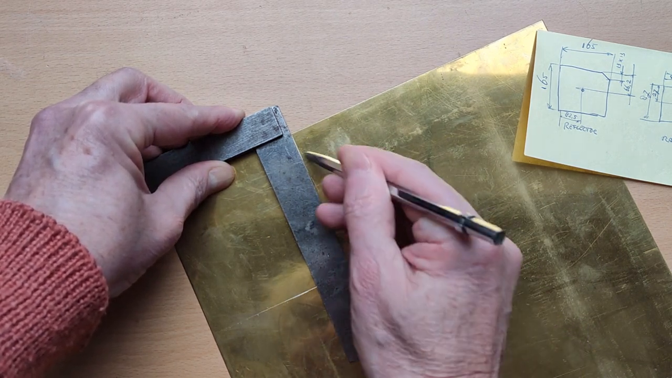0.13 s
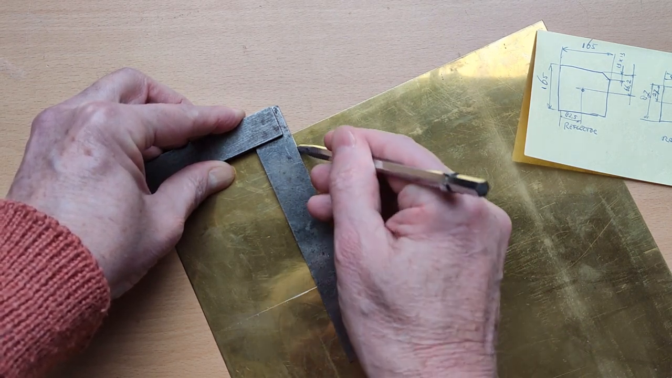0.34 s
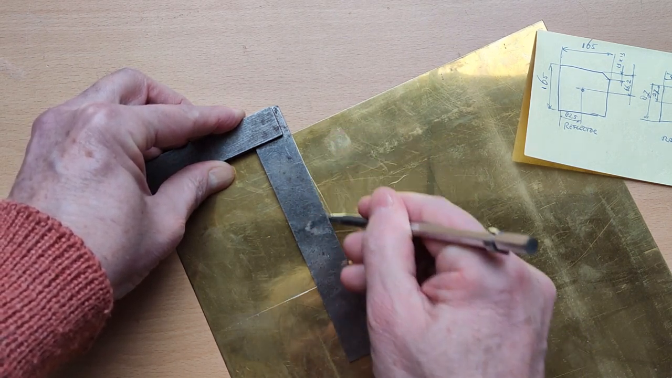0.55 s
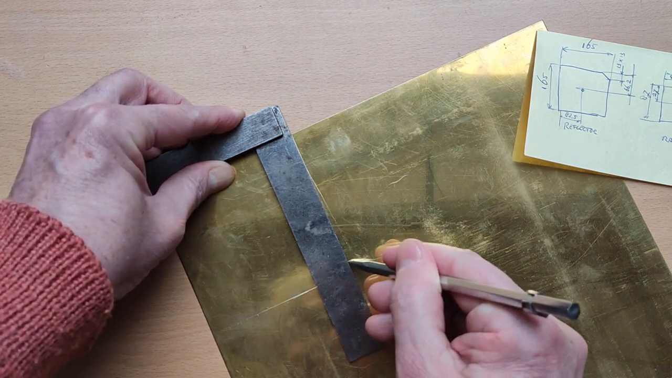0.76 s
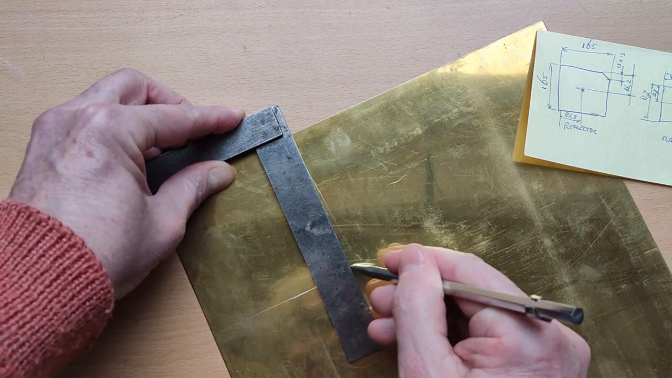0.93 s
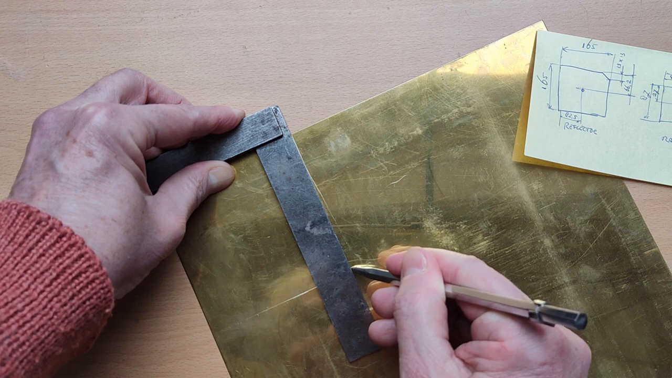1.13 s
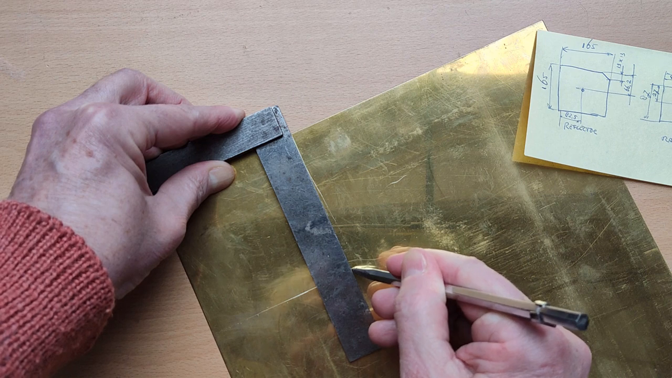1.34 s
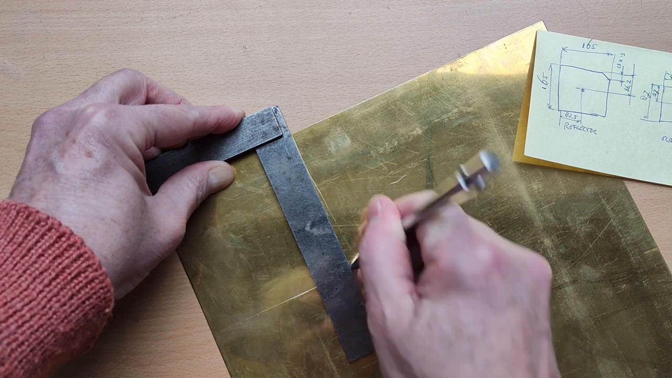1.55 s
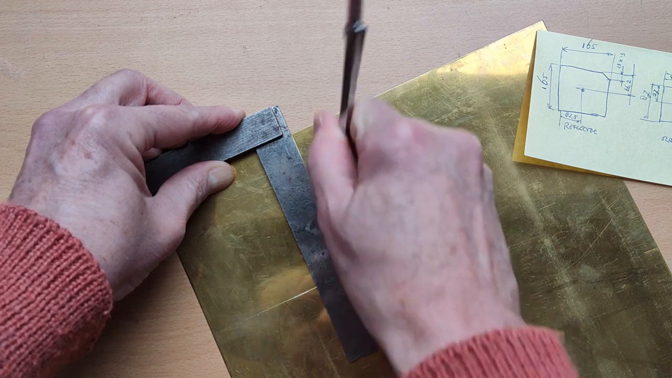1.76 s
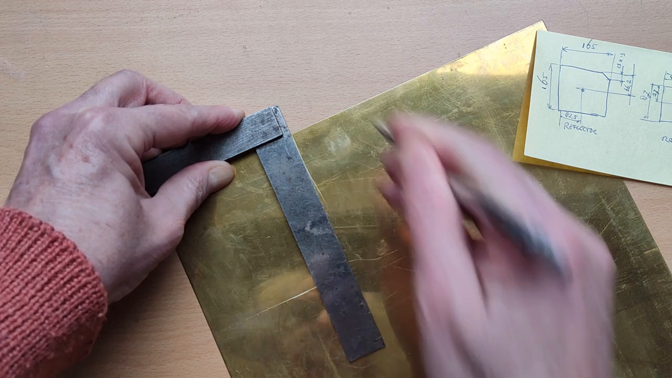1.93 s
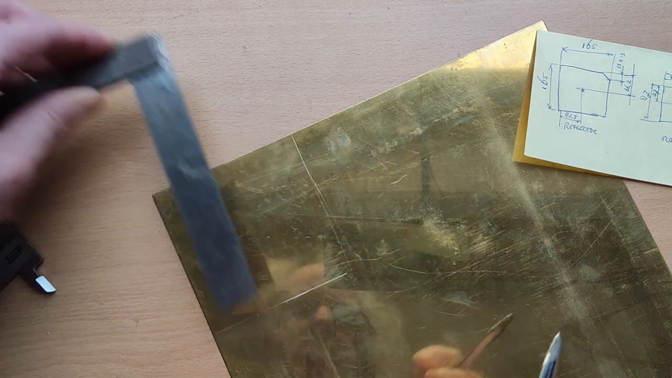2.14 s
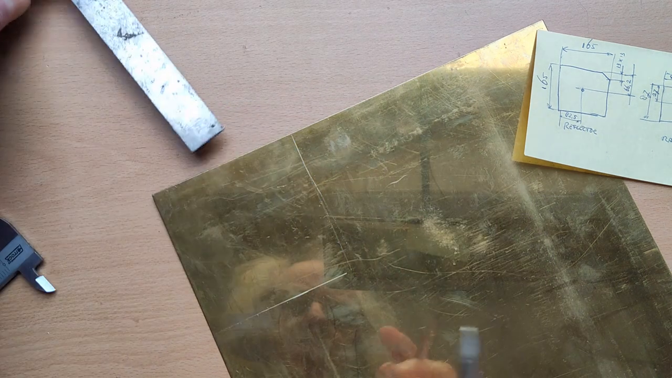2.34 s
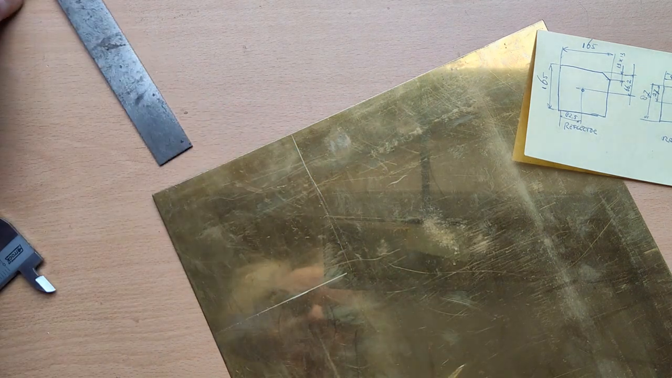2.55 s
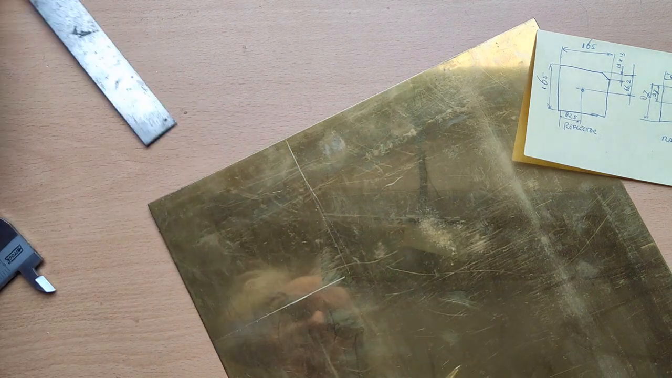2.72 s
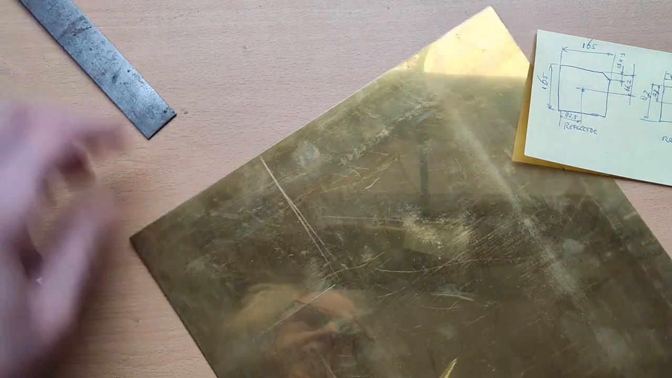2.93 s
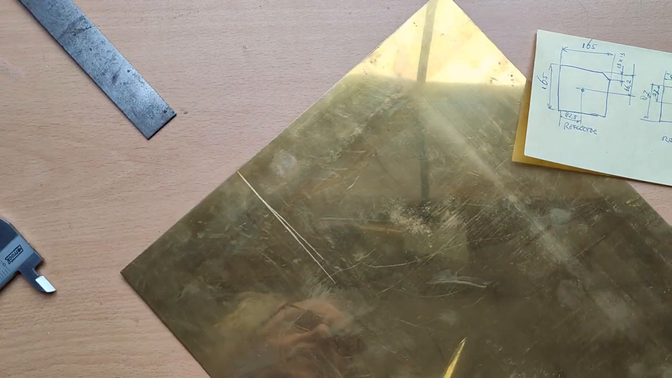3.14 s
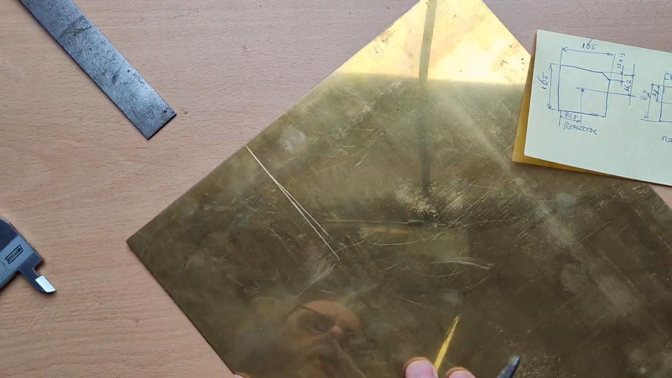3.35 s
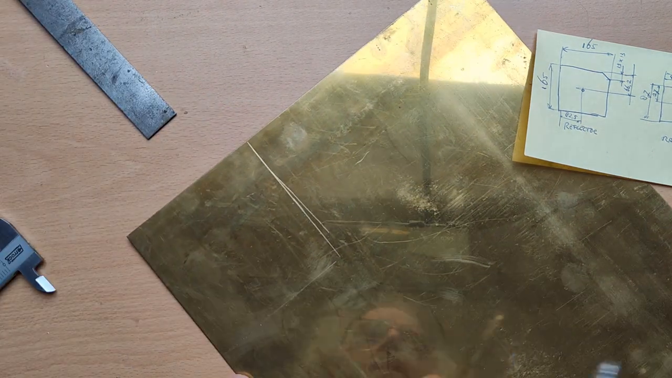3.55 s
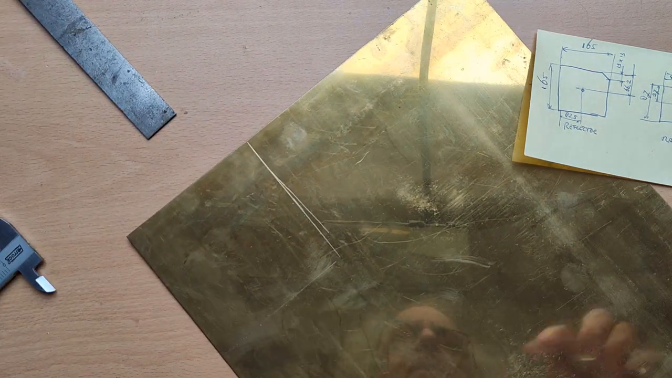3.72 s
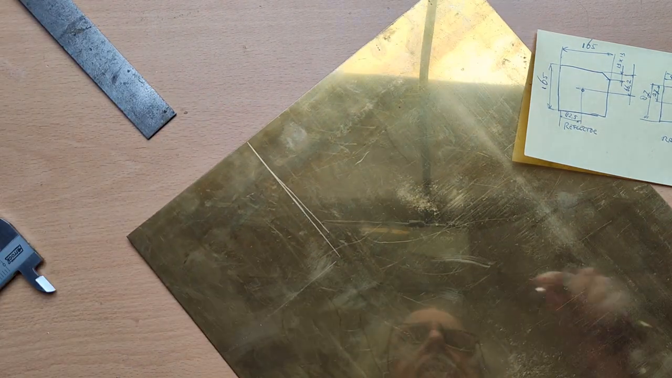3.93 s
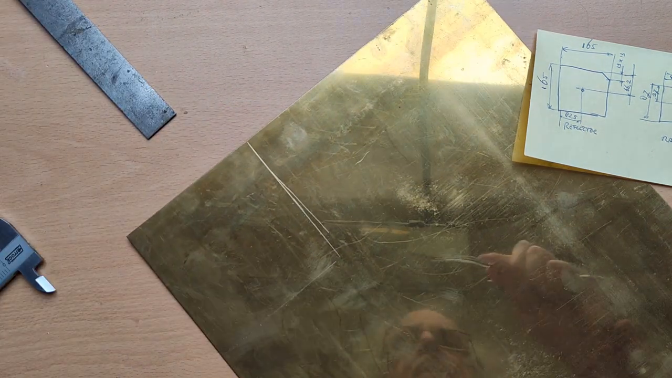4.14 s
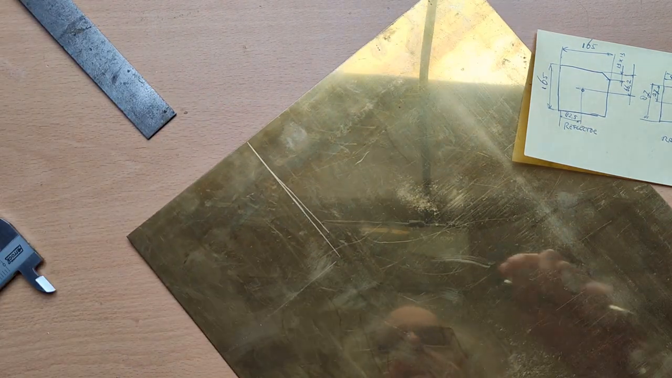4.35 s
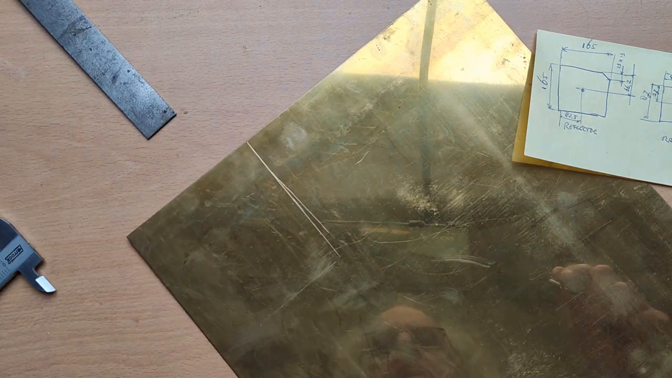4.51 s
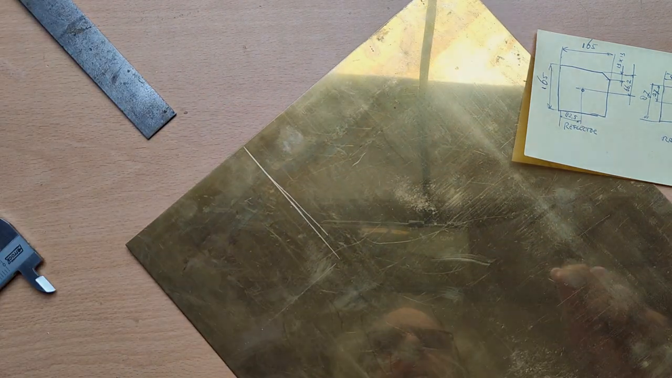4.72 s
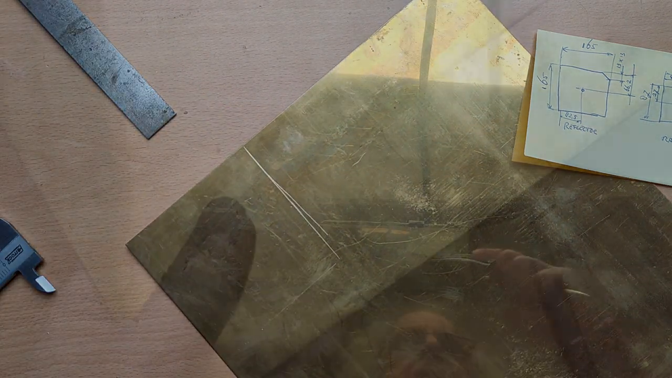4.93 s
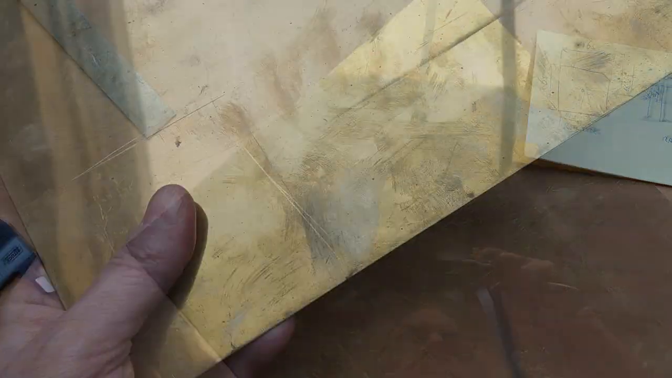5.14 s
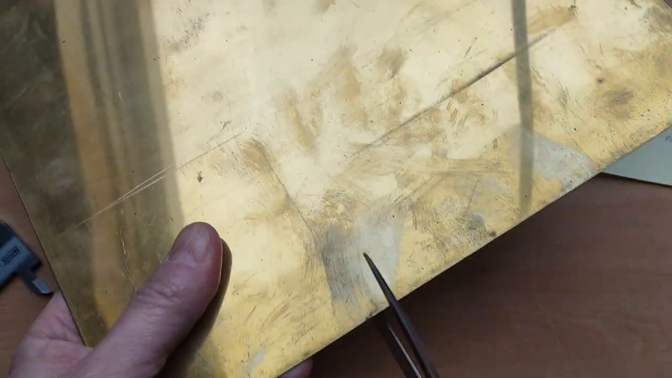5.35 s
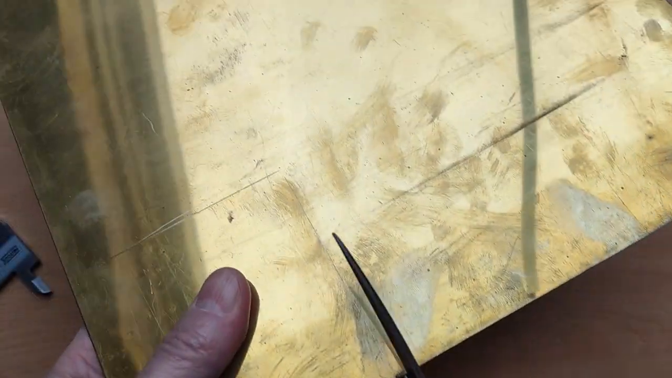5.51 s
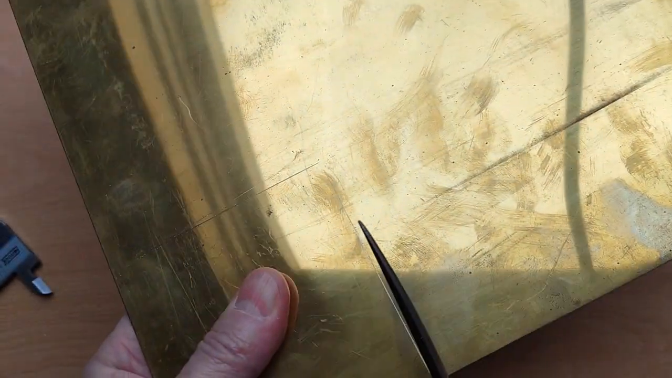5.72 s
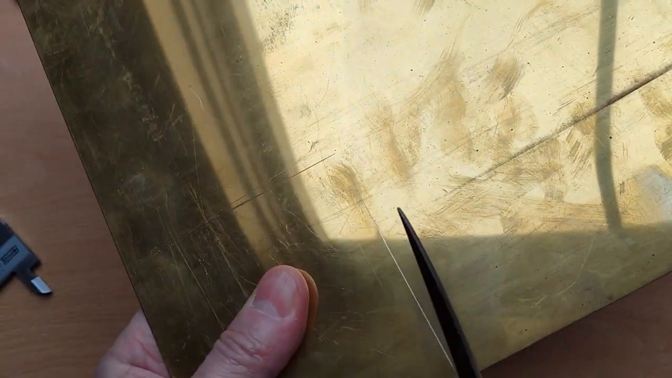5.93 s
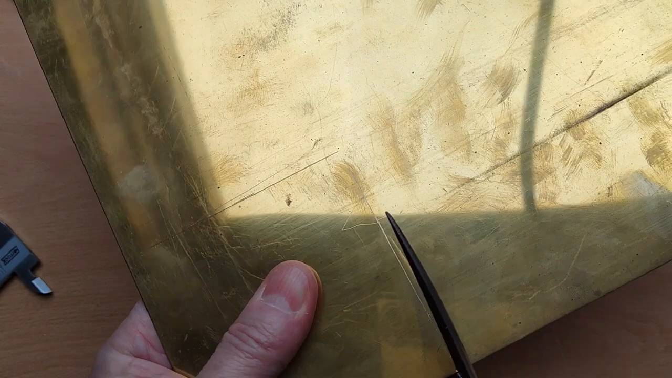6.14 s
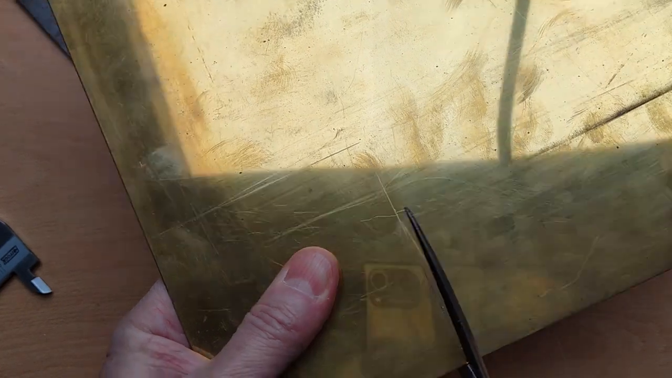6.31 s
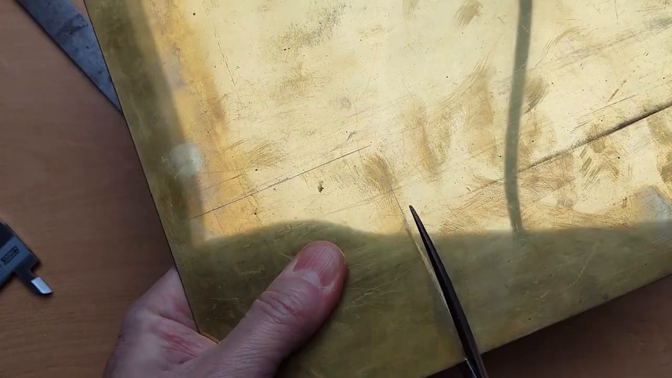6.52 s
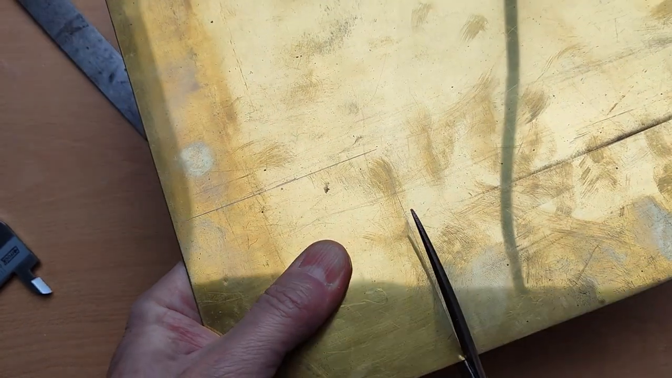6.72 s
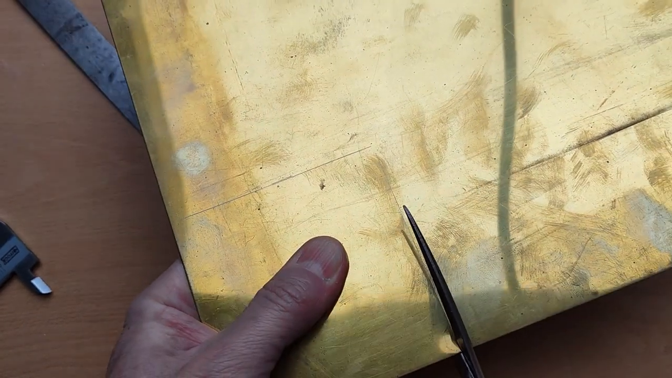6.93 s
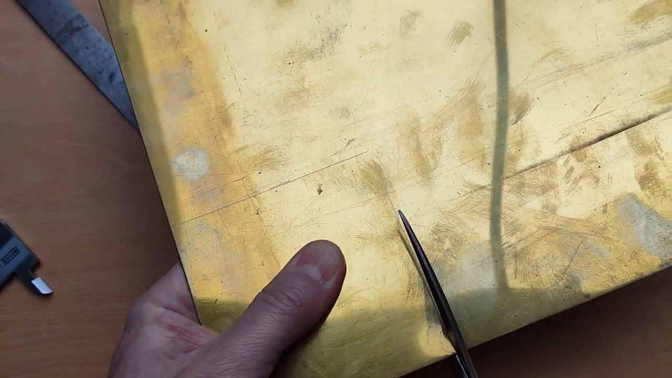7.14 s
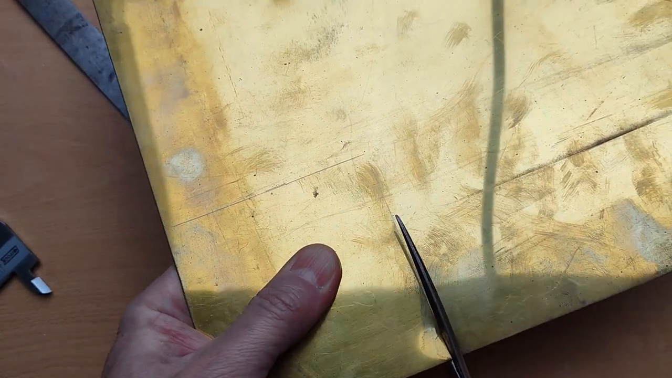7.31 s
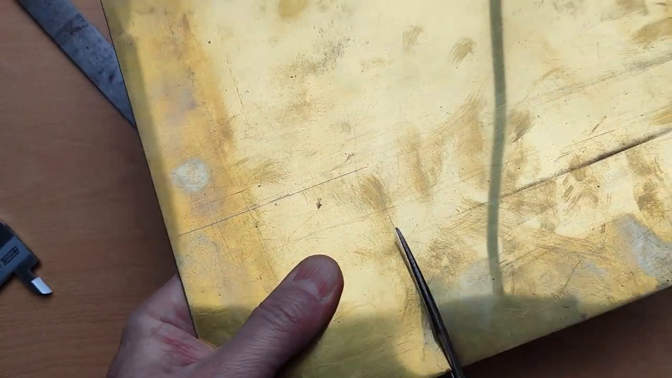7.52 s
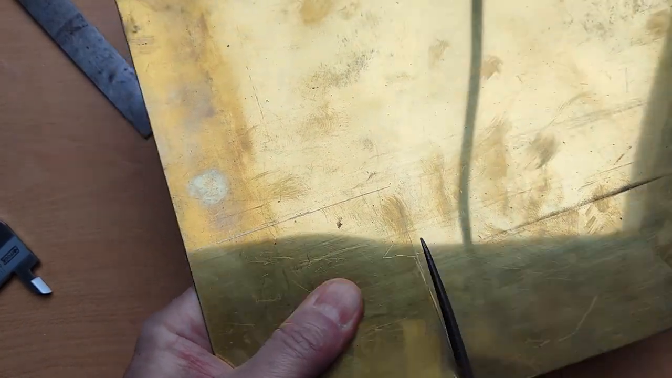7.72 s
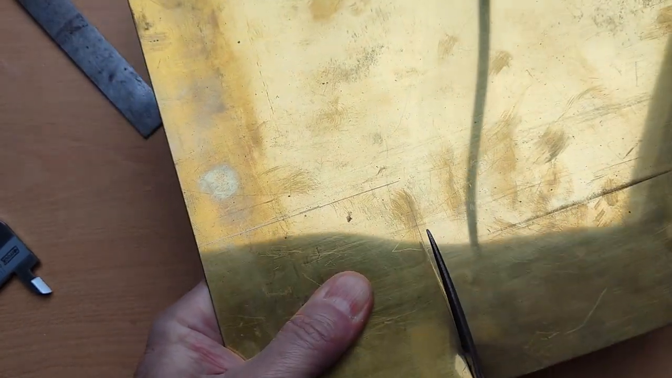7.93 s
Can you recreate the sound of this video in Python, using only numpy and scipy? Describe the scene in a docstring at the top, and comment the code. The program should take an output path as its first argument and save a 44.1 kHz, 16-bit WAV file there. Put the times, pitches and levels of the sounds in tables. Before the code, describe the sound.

Close stereo view of a workbench in a quiet room. A pointed tool touches a brass sheet, scratches slowly, then flicks a quick brighter stroke. A steel square rattles onto the wooden table, slides briefly and lands with a hard, ringing clack. Soft hisses pass, the sheet knocks and scrapes off the table, and light metal ticks follow while an engine rises faintly far away.

```python
"""A scriber scratches two strokes along a steel square on a brass sheet lying on a wooden table.
The square is slid off and set down with a clatter, and a second hard clack follows. Three soft hisses swell.
The sheet is knocked, dragged off the table and fitted into tin snips; an engine rises faintly far away.
Contacts are bursts of dense resonance plus decaying modes; scrapes are random slips through such bursts.
The engine is four harmonics, the bump one decaying sine, the room shaped noise."""
import sys
import numpy as np
from scipy import signal
from scipy.fft import irfft, next_fast_len
from scipy.io import wavfile
from scipy.ndimage import uniform_filter1d

SR = 44100
rng = np.random.default_rng(int(sys.argv[2]) if len(sys.argv) > 2 else 0)


def master_out(mix):
    """Clip the mix to full scale and print it as 16-bit PCM to the path in sys.argv[1]."""
    frames = np.transpose(np.atleast_2d(mix))
    ceiling = np.clip(frames, -1, 1)
    pcm = np.round(ceiling * 32767).astype(np.int16)
    wavfile.write(sys.argv[1], SR, pcm)


N = 355887
TIME = np.arange(N) / SR
RING_TIME = TIME[:SR // 2]

# left-right correlation of the sound field: (frequency [Hz], correlation [-1..1])
LIKENESS = [(30, -0.057), (130, 0.51), (300, 0.75), (600, 0.48), (1100, .15), (2200, 0.17), (5800, 0.015),
            (8300, .45), (12000, -0.41)]
# modes of the sheet lying flat: (frequency [Hz], mean level [dB], t60 [s], left-right [dB])
FLAT_SHEET = [(202.7, -2, 0.15, -2), (383, -8.5, 0.13, -4), (2595, -16.5, 0.061, 1), (2760, -19, 0.046, -2),
              (5150, -17.5, 0.1, 2), (6020, -6, 0.023, 14), (11500, -19, 0.082, 12)]
# dense resonances under slow rubbing: (frequency [Hz], relative density [dB per Hz])
SLOW_COLOUR = [(60, -26), (100, -0.5), (150, -29), (205, -0.5), (275, -4.5), (350, -4.5), (500, -10.5),
               (730, -13), (900, -16), (2100, -5), (3400, -20.5), (5000, -26.5), (6400, -21), (7300, -33),
               (15500, -31)]


def from_db(db):
    """Decibels to gain."""
    return 10 ** (np.asarray(db) / 20)


def fade(t60_s):
    """A free decay of 60 dB in t60_s."""
    return np.exp(-np.log(1000) * RING_TIME / t60_s)


def in_time(rows):
    """The columns of a curve at every sample."""
    time_s, *columns = np.transpose(rows)
    return np.array([np.interp(TIME, time_s, column) for column in columns])


def at_hz(points, hz):
    """Read a table on a log-frequency axis."""
    known_hz, values = np.transpose(points)
    return np.interp(np.log(hz + 1), np.log(known_hz), values)


def during(rows):
    """True from the first to the last row of a curve."""
    return (TIME >= rows[0][0]) & (TIME <= rows[-1][0])


def correlation(hz):
    """Left-right correlation at a frequency."""
    return np.clip(at_hz(LIKENESS, hz), -1, 1)


def noise(colour, size, lumps_db):
    """Stereo noise, rms 1, correlated by frequency; crowded resonances make its spectrum lumpy."""
    hz = np.arange(size // 2 + 1) * SR / size
    alike = correlation(hz)
    mid, side = np.exp(2j * np.pi * rng.random((2, len(hz))))
    pair = np.sqrt(1 + alike) * mid + np.sqrt(1 - alike) * side * [[1], [-1]]
    lump_hz = np.arange(0, SR / 2, 130)
    lumps = np.interp(hz, lump_hz, rng.standard_normal(len(lump_hz)))
    x = irfft(pair * from_db(at_hz(colour, hz) + lumps_db * lumps), size)
    return x / x.std()


def registers(x, size):
    """Low, middle and high part of a sound, each with rms 1 over its first size samples."""
    low_edge_hz, high_edge_hz = 900, 4000
    cuts = [(low_edge_hz, "low"), ([low_edge_hz, high_edge_hz], "band"), (high_edge_hz, "high")]
    parts = []
    for hz, kind in cuts:
        sos = signal.butter(4, hz, kind, fs=SR, output="sos")
        parts.append(signal.sosfilt(sos, x + 1e-18))
    parts = np.array(parts)
    return parts / parts[..., :size].std(axis=(1, 2), keepdims=True)


def shares(level_db, bright_db, middle_db):
    """Low, middle and high register levels in dB: a brighter sound trades bass for treble."""
    return level_db + np.array([-bright_db, middle_db, bright_db])


def response(colour, modes, t60_s, modes_db, room_db, spread_db):
    """One contact: dense resonances die fast, the room lingers, each mode rings at its own strength."""
    room_t60_s = 0.63
    decay = np.hypot(fade(t60_s), from_db(room_db) * fade(room_t60_s))
    out = noise(colour, len(RING_TIME), spread_db) * decay
    for hz, level_db, mode_t60_s, pan_db in modes:
        varied_db = level_db + modes_db + .5 * spread_db * rng.normal()
        strength = from_db(varied_db + pan_db * np.array([[.5], [-.5]]))
        apart = np.arccos(correlation(hz))   # left-right phase difference [rad]
        phase = 2 * np.pi * rng.random() + apart * np.array([[0], [1]])
        out = out + strength * np.sin(2 * np.pi * hz * RING_TIME + phase) * fade(mode_t60_s)
    return out


def blows(rows, colour, modes, t60_s, middle_db, modes_db, room_db, spread_db, carry_db, drops=()):
    """Single contacts: each scales the ringing before it by carry_db and rings on, through any level drops."""
    drop_s = 0.0023   # duration of a drop
    bass_cut_hz = 68   # small bodies radiate little below this
    bass_cut = signal.butter(2, bass_cut_hz, "high", fs=SR, output="sos")
    out = np.zeros((2, N + len(RING_TIME)))
    for start_s, level_db, bright_db in rows:
        body = response(colour, modes, t60_s, modes_db, room_db, spread_db)
        parts = registers(body, size=SR // 50)
        ring = np.tensordot(from_db(shares(level_db, bright_db, middle_db)), parts, 1)
        for drop_at_s, change_db in drops:
            if drop_at_s > start_s:
                dropped = np.clip((start_s + RING_TIME - drop_at_s) / drop_s, 0, 1)
                ring = ring * from_db(change_db * dropped)
        ring = signal.sosfilt(bass_cut, ring)
        first = round(start_s * SR)
        span = slice(first, first + len(RING_TIME))
        out[:, span] = from_db(carry_db) * out[:, span] + ring
    return out[:, :N]


def strokes(rows, attack_s, release_s, middle_db, peak_at, treble_lag, ease_db):
    """Register gains of a stroke: attack, swell to a peak, easing off, release.
    peak_at and treble_lag are shares of the stroke; the bass peaks before the middle, the treble after."""
    out = np.zeros((3, N))
    peaks = peak_at + treble_lag * np.array([[-1], [0], [1]])
    for start_s, end_s, level_db, bright_db in rows:
        inside = (TIME > start_s) & (TIME < end_s + release_s)
        t = TIME[inside]
        along = np.minimum((t - start_s) / (end_s - start_s), 1)
        attack = np.minimum((t - start_s) / attack_s, 1)
        release = np.exp(-np.log(1000) * np.maximum(t - end_s, 0) / release_s)
        eased_db = np.reshape(ease_db, (-1, 1)) * np.abs(along - peaks)
        levels_db = shares(level_db, bright_db, middle_db)[:, None] - eased_db
        out[:, inside] += attack * release * from_db(levels_db)
    return out


def scrape(gains, colour, modes, slips_per_s, grain_db, t60_s, modes_db, spread_db, count):
    """Random slips excite a body; each of count spots crossed rings a little differently."""
    inside = gains.any(0)
    size = inside.sum()
    sizes = from_db(grain_db * np.minimum(rng.exponential(1, N), 4)) * rng.choice([-1, 1], N)
    slips = (sizes * (rng.random(N) < slips_per_s / SR))[inside]
    spot = np.arange(size) * count // size
    rubbed = 0
    for k in range(count):
        body = response(colour, modes, t60_s, modes_db, room_db=-23, spread_db=spread_db)
        rung = signal.fftconvolve([slips * (spot == k)], body / body.std(), axes=1)
        rubbed = rubbed + rung[:, :size]
    parts = registers(rubbed, size)
    # the gains, not the spot, set the loudness
    power = uniform_filter1d((parts ** 2).mean(1, keepdims=True), size=SR // 16)
    out = np.zeros((2, N))
    out[:, inside] = (parts / np.sqrt(power) * gains[:, None, inside]).sum(0)
    return out


def room_noise():
    """A steady low murmur of air under a faint, slowly varying hiss."""
    # spectrum of the air: (frequency [Hz], relative density [dB per Hz])
    air_colour = [(20, 3), (45, -2), (100, -6.5), (170, -5), (330, -8), (550, -13.5), (900, -18.5),
                  (1350, -15.5), (2000, -21), (2750, -21.5), (3600, -27), (7000, -29.5), (15800, -28)]
    # upper registers: (time [s], middle level before trim [dB], high level before trim [dB])
    air_level = [(0, -75.5, -74), (1.4, -78, -75), (5.4, -73, -73), (6.1, -77, -76.5), (8.07, -73, -75.5)]
    murmur_before_trim_db, trim_db = -66.5, 2.41
    air = noise(air_colour, next_fast_len(N, True), lumps_db=1.56)[:, :N]
    low, middle, high = registers(air, N)
    middle_db, high_db = in_time(air_level)
    mix = from_db(murmur_before_trim_db) * low + from_db(middle_db) * middle + from_db(high_db) * high
    return from_db(trim_db) * mix


def engine():
    """Only the lowest orders of an accelerating engine pass the walls, each fluttering on its way."""
    # distant engine: (time [s], firing rate [Hz], level before order levels [dB])
    run = [(6.1, 121, -84), (6.28, 126, -66), (6.4, 131.8, -67), (6.58, 152.9, -61), (6.82, 159.9, -66.5),
           (7.0, 171.6, -72.5), (7.25, 164.4, -73)]
    # multiples 1, 2, 3... of the firing rate: (mean level [dB])
    orders_db = [-0.5, -0.5, -15, -12.5]
    flutter_rms_db = 2.7
    firing_hz, level_db = in_time(run)
    cycles = np.cumsum(firing_hz) / SR
    out = np.zeros(N)
    for k, order_db in enumerate(orders_db, 1):
        flutter = uniform_filter1d(rng.standard_normal(N), size=SR // 20)
        gain = from_db(order_db + flutter_rms_db * flutter / flutter.std())
        out += gain * np.sin(2 * np.pi * k * cycles)
    return out * from_db(level_db) * during(run)


def bump():
    """A soft push wakes only the table's lowest mode."""
    start_s, mode_hz, t60_s = 3.58, 185, 0.082
    level_before_envelope_db, swell_s = -39.5, .006
    age = np.maximum(TIME - start_s, 0)
    swell = 1 - np.exp(-age / swell_s)
    decay = np.exp(-np.log(1000) * age / t60_s)
    return from_db(level_before_envelope_db) * swell * decay * np.sin(2 * np.pi * mode_hz * age)


def soft_hiss():
    """Three times soft noise swells and fades, with no modes."""
    # swells: (start [s], end [s], level [dB], brightness [dB])
    swells = [(3.11, 3.32, -75.5, 5.5), (3.37, 3.53, -67, 1), (3.76, 3.99, -72, -4.5)]
    # spectrum of the hiss: (frequency [Hz], relative density [dB per Hz])
    hiss_colour = [(100, -10), (400, 2), (900, -4.5), (2200, -3), (6300, -13), (8000, -30), (15500, -21)]
    gains = strokes(swells, attack_s=0.025, release_s=0.22, middle_db=0.5,
                    peak_at=0.76, treble_lag=0.045, ease_db=3.5)
    return scrape(gains, hiss_colour, [], slips_per_s=5000, grain_db=2.5, t60_s=.012,
                  modes_db=0, spread_db=0, count=12)


def brass_sheet():
    """Fingers shift on the sheet; it knocks, drags over the wood and meets the jaws of the snips."""
    # grip shifts, short pulls off the table: (start [s], end [s], level [dB], brightness [dB])
    grip_rows, drag_rows = [(4.51, 4.6, -73.5, -15.5)], [(4.83, 4.873, -51.5, -8.5), (4.908, 4.94, -55, -11),
                                          (5.022, 5.045, -57, -6), (5.07, 5.11, -55.5, -9.5),
                                          (5.112, 5.172, -44, -3), (5.172, 5.215, -57, -10.5)]
    # jaws slide on the sheet: (start [s], end [s], level before pan [dB], brightness [dB])
    jaw_rows = [(5.695, 5.735, -66.5, 0.5), (5.81, 5.868, -65.5, 1), (7.92, 7.95, -67.5, -5)]
    # sheet knocks on the table: (time [s], level before trim [dB], brightness [dB])
    knock_rows = [(2.174, -65, -9), (4.8108, -52.5, -16), (4.8235, -44.5, 0.5), (4.843, -53.5, -8),
                  (4.866, -59, -10.5), (4.914, -59, -12), (4.985, -53.5, -7.5), (5.107, -51.5, -15.5),
                  (5.203, -49.5, -4.5)]
    # snips touch the edge: (time [s], level before pan [dB], brightness [dB])
    tick_rows = [(5.692, -59.5, 3.5), (6.197, -64, -4), (6.235, -69, 1), (6.506, -75, -2.5), (7.18, -83, 7),
                 (7.771, -71.5, -3)]
    # modes of lifted sheet: (frequency [Hz], mean level [dB], t60 [s], left-right [dB])
    lifted_sheet = [(417, -1.5, 0.12, 0.5), (514, -4, .07, -8), (652, -2.5, 0.083, 7),
                    (710, -10, 0.15, -6.5), (1054, -8, 0.1, 1), (1543, -13, 0.15, -9),
                    (2280, -43, 0.071, -1), (5250, -24, 0.037, 12)]
    # modes of snips: (frequency [Hz], mean level [dB], t60 [s], left-right before pan [dB])
    snips = [(754, -0.5, 0.13, 0), (996, -9, 0.19, 0.79), (1220, -8, 0.44, 1), (1470, -3.5, 0.15, 1.2),
             (2020, -9.5, 0.26, 0), (3406, -17, 0.25, 2), (3940, -21, 0.22, 1)]
    # dense resonances of sheet, snips: (frequency [Hz], relative density [dB per Hz])
    sheet_colour, snip_colour = [(90, -26), (270, -42), (420, -12.5), (720, -6), (860, -29), (1080, -7),
                                 (1300, -15.5), (2400, -11.5), (2900, -21.5), (4000, -22), (5800, -23),
                                 (8000, -33), (11000, -32.5), (15500, -47)], [(150, -6), (500, 7), (900, 5), (1600, -1.5),
                                                       (2300, -7), (4500, -17), (8000, -25), (15500, -31)]
    knock_trim_db, snip_pan_db = -1.5, [[1.8], [.2]]

    shift = strokes(grip_rows, attack_s=0.026, release_s=.3, middle_db=-18,
                    peak_at=.4, treble_lag=0.26, ease_db=5)
    pulls = strokes(drag_rows, attack_s=0.0082, release_s=.09, middle_db=-0.5,
                    peak_at=0.57, treble_lag=.1, ease_db=3.5)
    push = strokes(jaw_rows, attack_s=0.0077, release_s=0.065, middle_db=1,
                   peak_at=.45, treble_lag=0.05, ease_db=0)
    grip = scrape(shift, SLOW_COLOUR, FLAT_SHEET, slips_per_s=1300, grain_db=0.5, t60_s=.04,
                  modes_db=-8, spread_db=1.5, count=2)
    knocks = blows(knock_rows, sheet_colour, lifted_sheet, t60_s=0.085, middle_db=3.5,
                   modes_db=0.5, room_db=-15.5, spread_db=5, carry_db=-14)
    drag = scrape(pulls, sheet_colour, lifted_sheet, slips_per_s=1000, grain_db=4.5, t60_s=0.08,
                  modes_db=1, spread_db=4.5, count=14)
    ticks = blows(tick_rows, snip_colour, snips, t60_s=0.077, middle_db=1.5,
                  modes_db=-5.5, room_db=-14.5, spread_db=1.5, carry_db=-8)
    jaws = scrape(push, snip_colour, snips, slips_per_s=2200, grain_db=2, t60_s=0.088,
                  modes_db=0, spread_db=6.5, count=2)
    return grip + from_db(knock_trim_db) * knocks + drag + (ticks + jaws) * from_db(snip_pan_db)


def steel_square():
    """The square slides off, rattles down blade first, is pushed along and falls with a hard clack."""
    # slides off the sheet, pushes over the table: (start [s], end [s], level [dB], brightness [dB])
    off_rows, push_rows = [(2.11, 2.15, -77, -15), (2.153, 2.195, -61, -14.5)], [(2.73, 2.775, -81, -19.5), (2.778, 2.85, -68.5, -3.5),
                                               (2.86, 2.945, -62.5, -4)]
    # thin blade taps the table: (time [s], level [dB], brightness [dB])
    tap_rows = [(2.5712, -45, 2), (2.598, -37, -3), (2.613, -34, 1), (2.636, -32.5, 3), (2.9467, -43, 0)]
    # heavy stock lands: (time [s], level before trim [dB], brightness [dB])
    clack_rows = [(2.6545, -35.5, -9.5), (2.674, -36, 5), (2.9665, -22, 0), (3.004, -41, 6)]
    # landed stock presses the blade down: (time [s], level change [dB])
    pinned = [(2.654, -18)]
    # the ringing drops abruptly: (time [s], level change [dB])
    ring_drops = [(2.697, -9.5), (3.031, -19)]
    # modes of whole square, blade: (frequency [Hz], mean level [dB], t60 [s], left-right [dB])
    steel, blade = [(232, -17, .2, 1), (511, -7, 0.19, -1.5), (1075, -17.5, 0.14, 4),
                    (1626, -6, 0.11, -1.5), (1947, -5, .08, 2.5), (2050, -11, .08, -1.5),
                    (2285, -16, .1, -2.5), (2640, -17, .1, -2), (2990, -19, 0.064, -2.5),
                    (4150, -22.5, 0.091, 3), (4340, -22, 0.071, 2.5), (6128, -8.5, 0.13, 8.5),
                    (6330, -19, .07, 4), (8300, -10, 0.098, 2), (8400, -18.5, 0.098, 3),
                    (10630, -26.5, .12, -2), (10840, -16, 0.095, 1.5), (12690, -33.5, .12, 0),
                    (13060, -27, .13, 2.5)], [(520, -4, .12, -3), (1180, -1, .14, -1), (1670, 1, .14, 1),
                                   (2800, 0, .11, -1), (3230, -8, .1, 0), (4100, -11, .11, 0),
                                   (4450, -11, .07, 0), (5325, -7, .12, 4), (5965, -6, .13, 3),
                                   (6130, -5, .1, 4), (8280, -10, .15, 2), (10230, -14, .13, -3),
                                   (10800, -18, .1, 2), (12950, -21, .1, 0)]
    # dense resonances of the table: (frequency [Hz], relative density [dB per Hz])
    table_colour = [(60, -25.5), (130, -15.5), (200, -4.5), (380, -1.5), (550, 1), (800, -7.5), (1300, -4),
                    (2000, 0.5), (3200, -8.5), (4200, -15), (6400, -17), (7400, -29), (11000, -36),
                    (15500, -41.5)]
    clack_trim_db = -0.32

    pull = strokes(off_rows, attack_s=0.007, release_s=.06, middle_db=-3,
                   peak_at=0.71, treble_lag=0.13, ease_db=13)
    push = strokes(push_rows, attack_s=0.0045, release_s=0.15, middle_db=8.5,
                   peak_at=.3, treble_lag=.05, ease_db=1.5)
    off = scrape(pull, table_colour, FLAT_SHEET, slips_per_s=3600, grain_db=2.5, t60_s=0.042,
                 modes_db=-9.5, spread_db=3.0, count=3)
    slide = scrape(push, table_colour, blade, slips_per_s=3100, grain_db=2.5, t60_s=0.056,
                   modes_db=1.5, spread_db=1.5, count=4)
    taps = blows(tap_rows, table_colour, blade, t60_s=.17, middle_db=1.0, modes_db=-4,
                 room_db=-19, spread_db=4.5, carry_db=-4, drops=[*pinned, *ring_drops])
    clacks = blows(clack_rows, table_colour, steel, t60_s=0.12, middle_db=7.0, modes_db=1.0,
                   room_db=-22, spread_db=4.0, carry_db=1.5, drops=ring_drops)
    return off + slide + taps + from_db(clack_trim_db) * clacks


def scriber():
    """The point touches down and cuts the brass, once slowly and once quickly, snagging here and there."""
    # slow cut, creep; light start, bite and flick: (start [s], end [s], level [dB], brightness [dB])
    slow_rows, quick_rows = [(.55, .943, -55, -8.5), (1.01, 1.045, -65, -10)], [(1.87, 1.9, -67, -17), (1.895, 1.945, -57.5, -6),
                                                  (1.941, 2.026, -44.5, -0.5)]
    # point touches down; snags in its groove: (time [s], level before trim [dB], brightness [dB])
    touch_rows, snag_rows = [(.361, -61, 0.5), (1.665, -76.5, -12.5), (1.862, -69.5, -15)], [(.694, -62.5, -6), (.778, -70, -5), (.8, -63, -18),
                                              (2.002, -55, 12)]
    # dense resonances under quick contact: (frequency [Hz], relative density [dB per Hz])
    quick_colour = [(53, -46), (90, 2.5), (204, 0), (264, 5), (365, 3), (562, -6.5), (1050, -17),
                    (1190, -21.5), (2480, -11), (3360, -25.5), (6140, -5.5), (7140, -18), (11700, -20.5),
                    (15500, -20)]
    contact_trim_db = -1.6

    pull = strokes(slow_rows, attack_s=0.052, release_s=.07, middle_db=1.5,
                   peak_at=0.31, treble_lag=0.026, ease_db=[8, 18, 8])
    flick = strokes(quick_rows, attack_s=0.0036, release_s=.025, middle_db=4,
                    peak_at=0.53, treble_lag=0.35, ease_db=[16, 16, 11])
    slow = scrape(pull, SLOW_COLOUR, FLAT_SHEET, slips_per_s=2300, grain_db=1.5, t60_s=0.036,
                  modes_db=-12.5, spread_db=0.5, count=12)
    quick = scrape(flick, quick_colour, FLAT_SHEET, slips_per_s=2700, grain_db=3.0, t60_s=0.052,
                   modes_db=-2.5, spread_db=2.0, count=8)
    touches = blows(touch_rows, quick_colour, FLAT_SHEET, t60_s=0.18, middle_db=4.5,
                    modes_db=5, room_db=-27, spread_db=0, carry_db=-6)
    snags = blows(snag_rows, quick_colour, FLAT_SHEET, t60_s=0.03, middle_db=2,
                  modes_db=4, room_db=-32, spread_db=1.0, carry_db=-6)
    return slow + quick + from_db(contact_trim_db) * (touches + snags)


def scene():
    """The work on the table, over soft hisses, the room and the distant engine."""
    background = room_noise() + engine()
    return background + bump() + soft_hiss() + brass_sheet() + steel_square() + scriber()


def record(dry):
    """Loud peaks are rounded and the top is cut."""
    ceiling, cutoff_hz = 1.3, 15900
    rounded = ceiling * np.tanh(dry / ceiling)
    top_cut = signal.ellip(10, .1, 80, cutoff_hz, fs=SR, output="sos")
    return signal.sosfilt(top_cut, rounded)


dry = scene()
out = record(dry)
master_out(out)
```